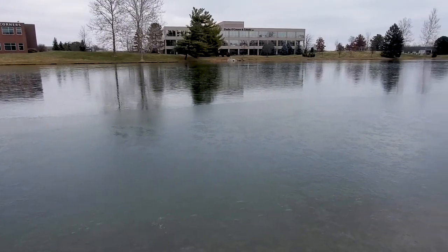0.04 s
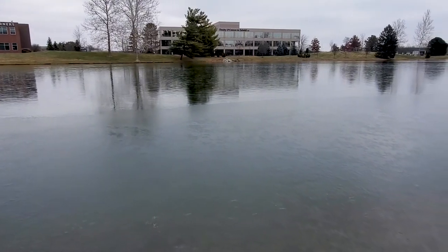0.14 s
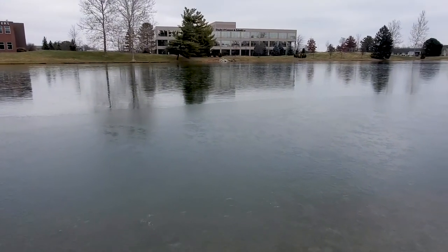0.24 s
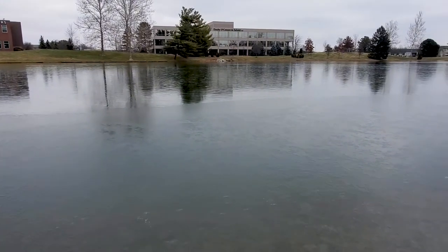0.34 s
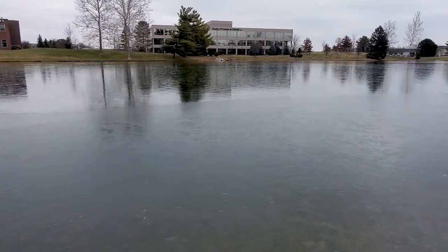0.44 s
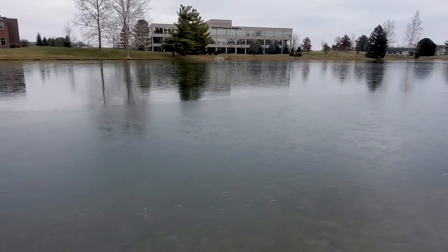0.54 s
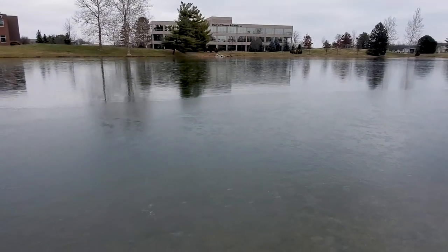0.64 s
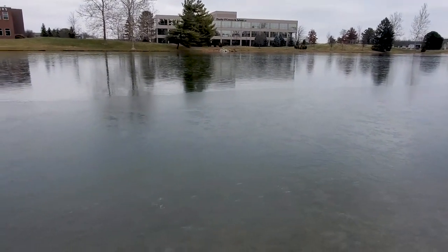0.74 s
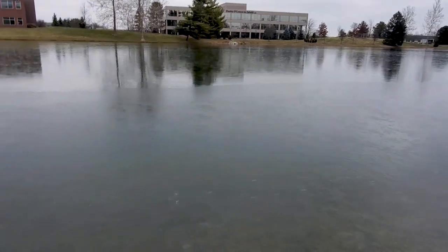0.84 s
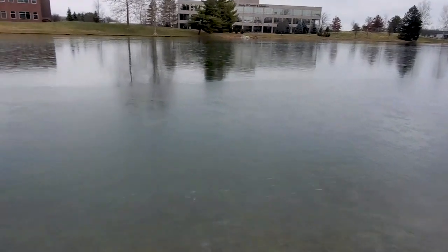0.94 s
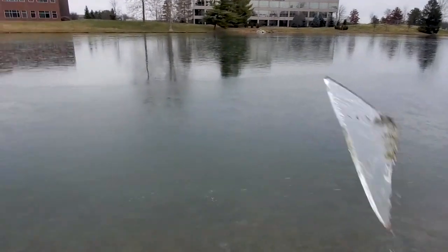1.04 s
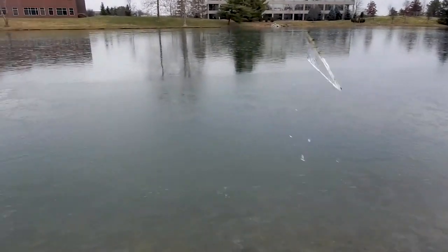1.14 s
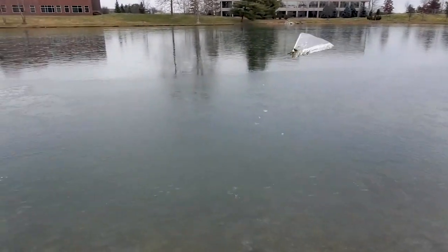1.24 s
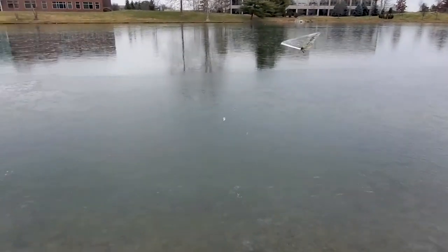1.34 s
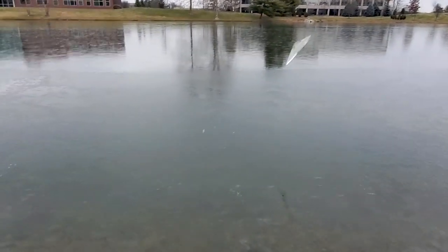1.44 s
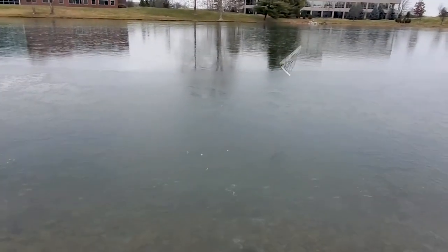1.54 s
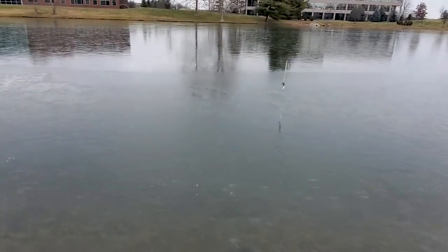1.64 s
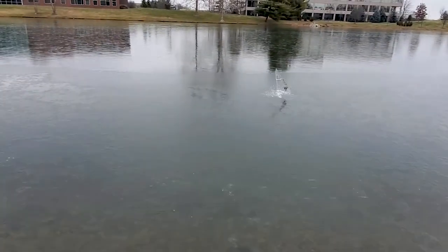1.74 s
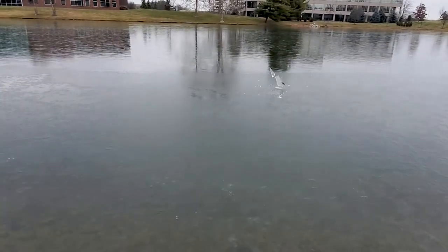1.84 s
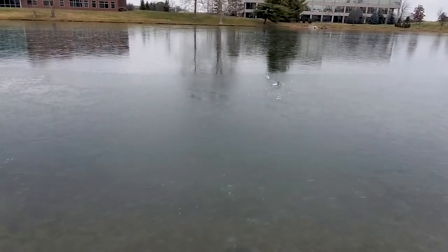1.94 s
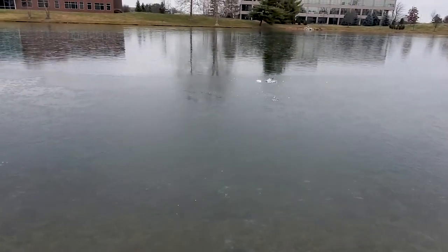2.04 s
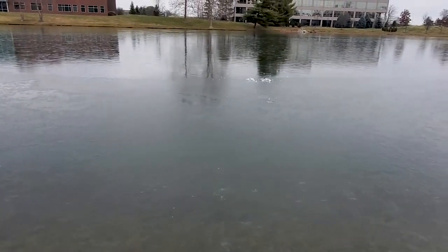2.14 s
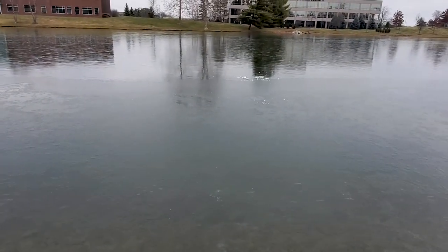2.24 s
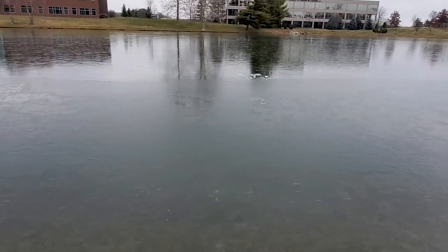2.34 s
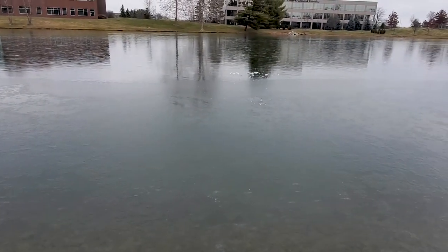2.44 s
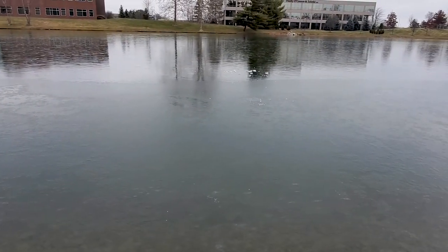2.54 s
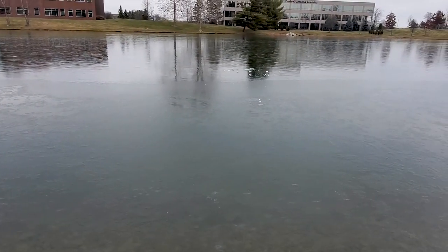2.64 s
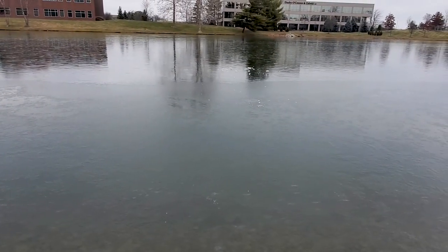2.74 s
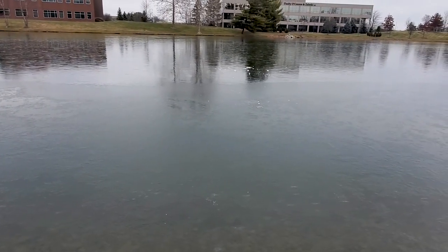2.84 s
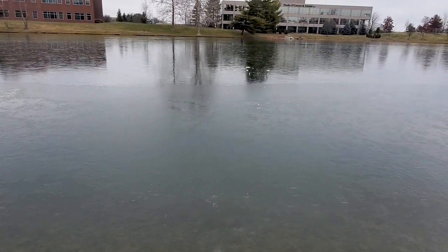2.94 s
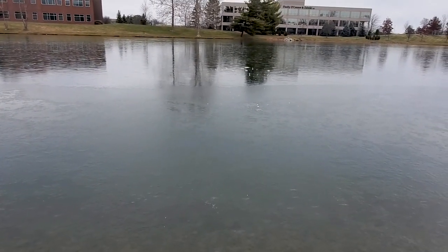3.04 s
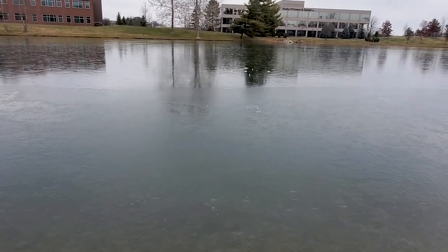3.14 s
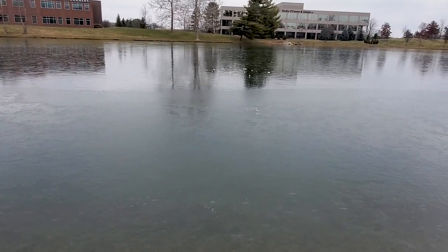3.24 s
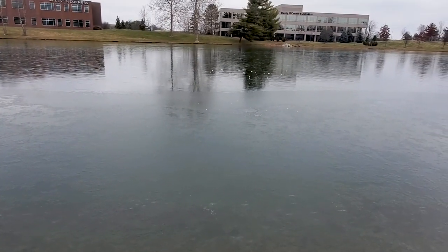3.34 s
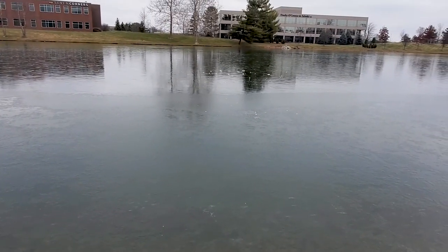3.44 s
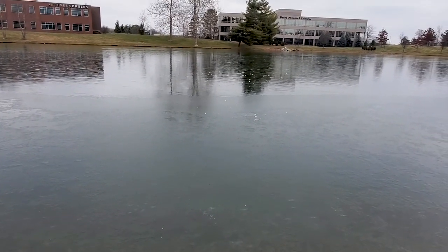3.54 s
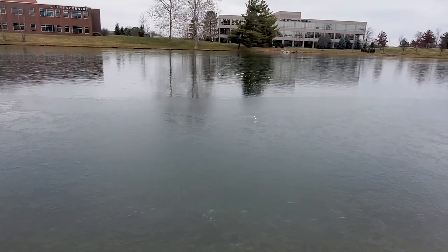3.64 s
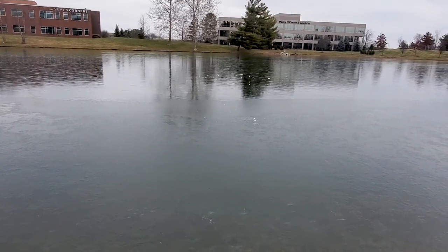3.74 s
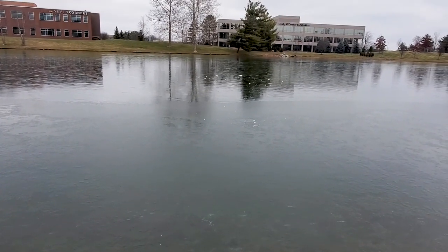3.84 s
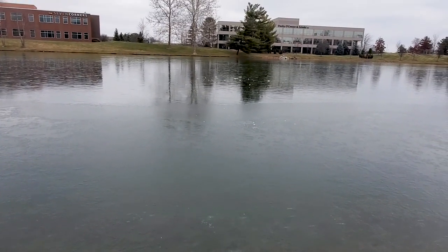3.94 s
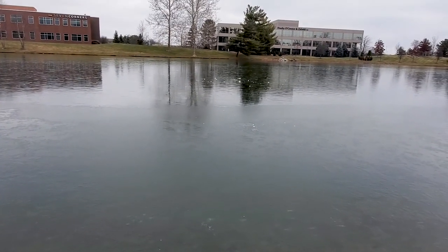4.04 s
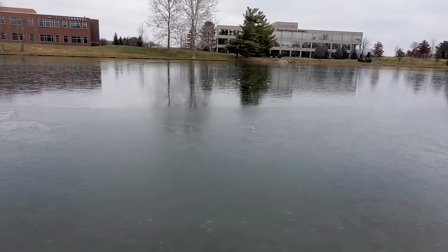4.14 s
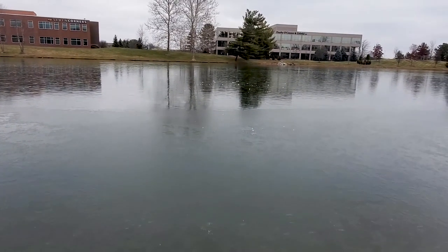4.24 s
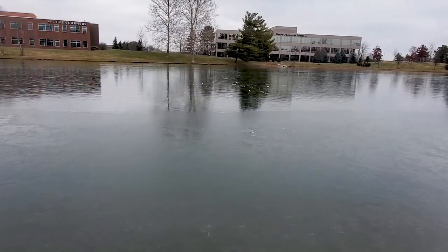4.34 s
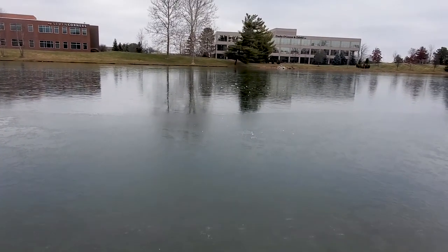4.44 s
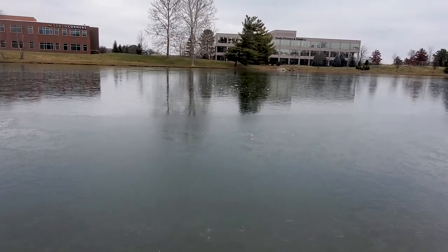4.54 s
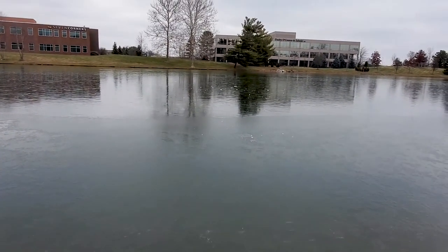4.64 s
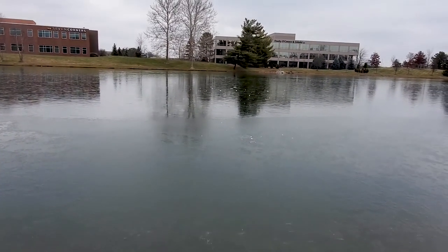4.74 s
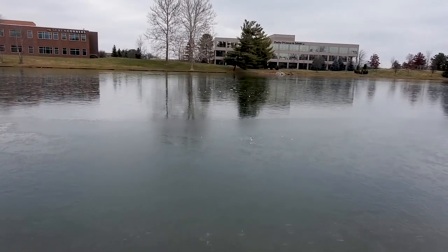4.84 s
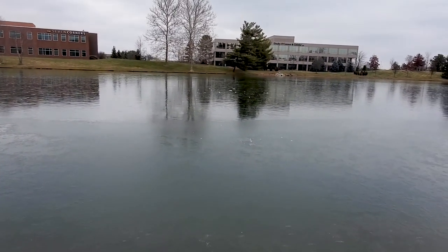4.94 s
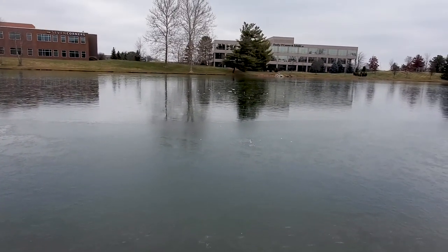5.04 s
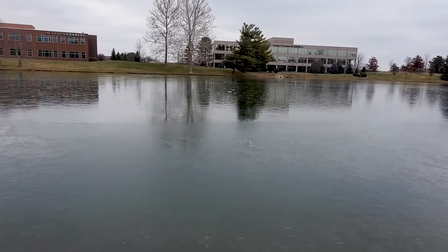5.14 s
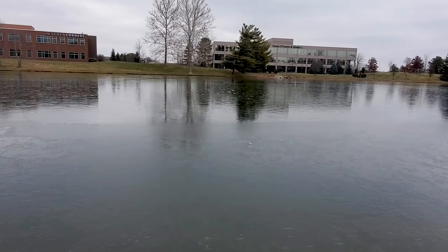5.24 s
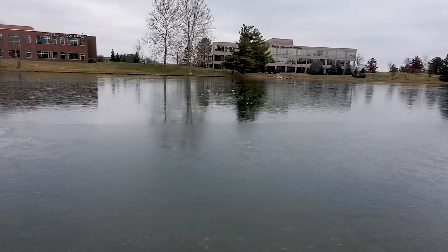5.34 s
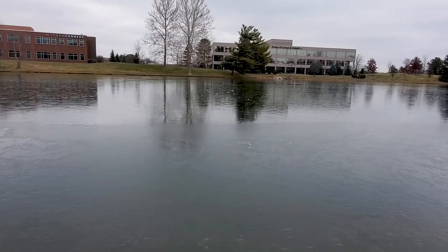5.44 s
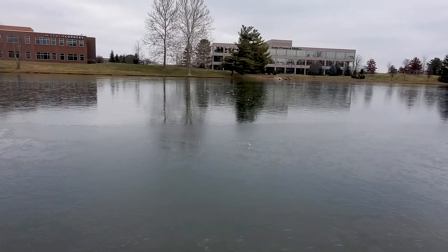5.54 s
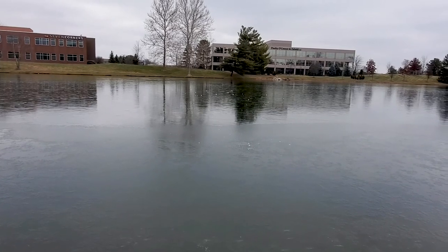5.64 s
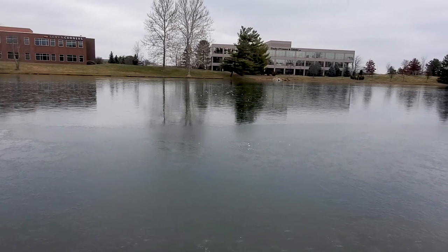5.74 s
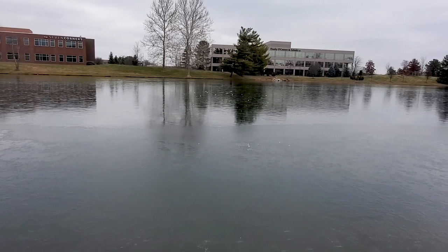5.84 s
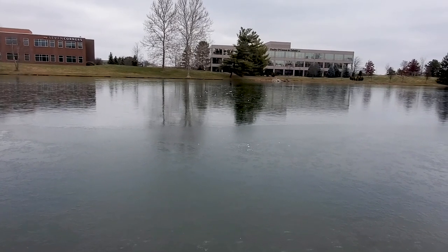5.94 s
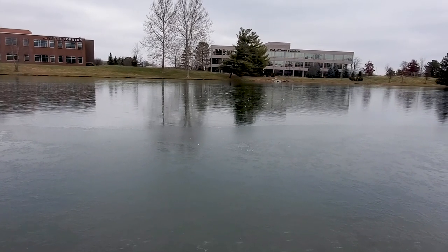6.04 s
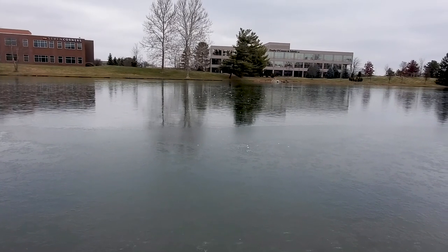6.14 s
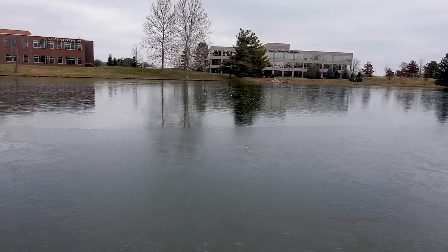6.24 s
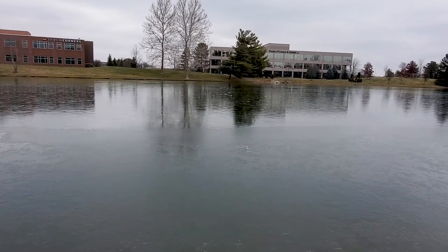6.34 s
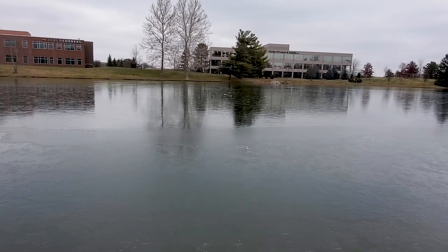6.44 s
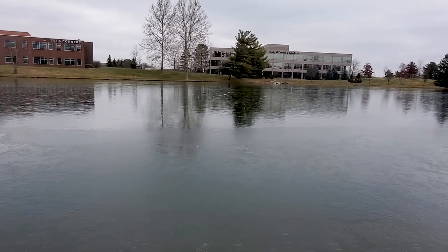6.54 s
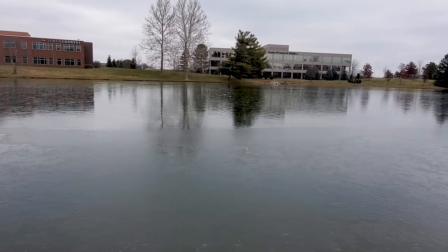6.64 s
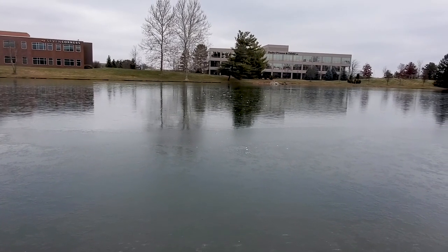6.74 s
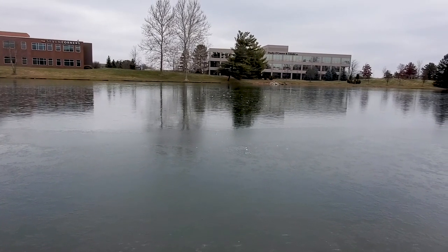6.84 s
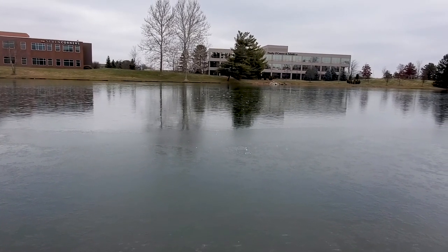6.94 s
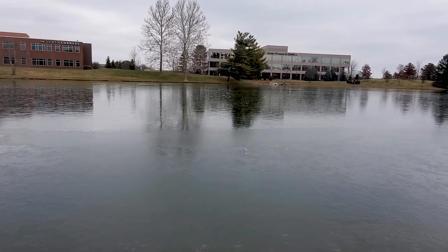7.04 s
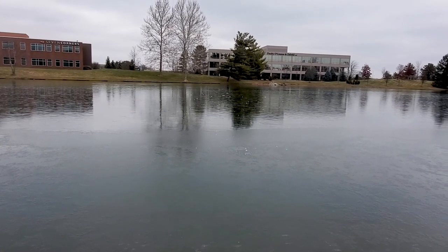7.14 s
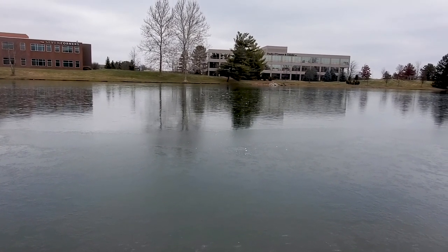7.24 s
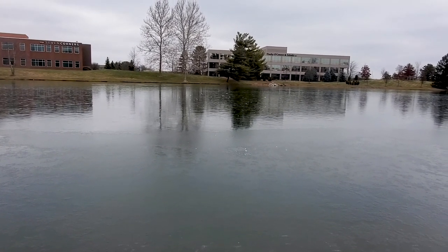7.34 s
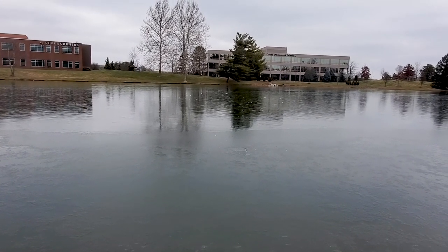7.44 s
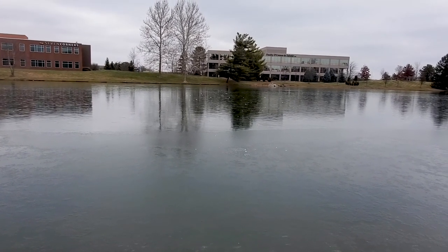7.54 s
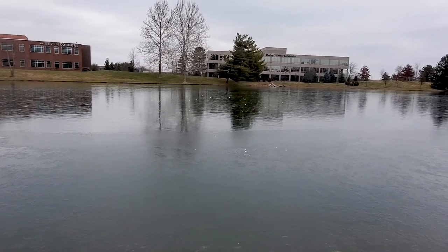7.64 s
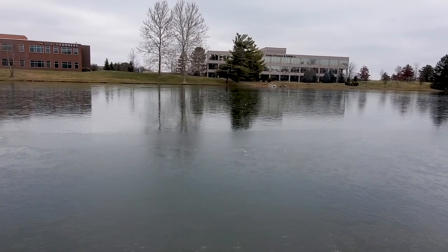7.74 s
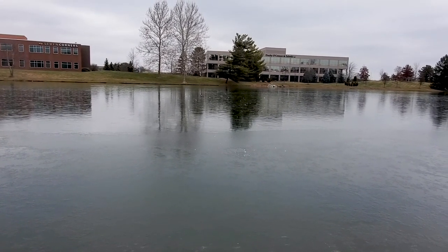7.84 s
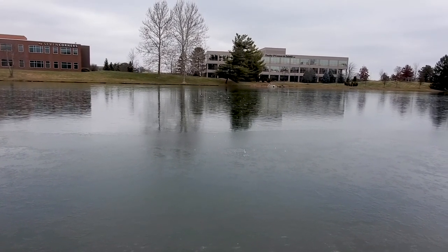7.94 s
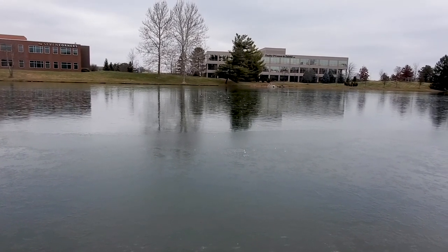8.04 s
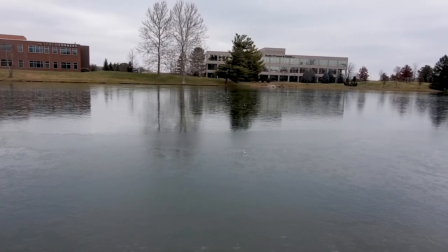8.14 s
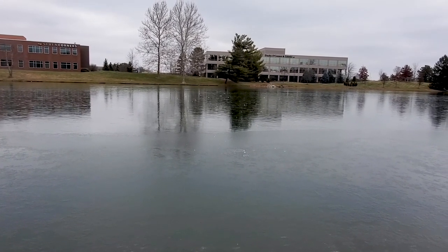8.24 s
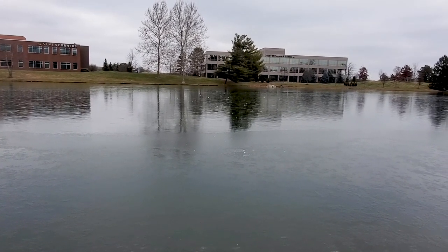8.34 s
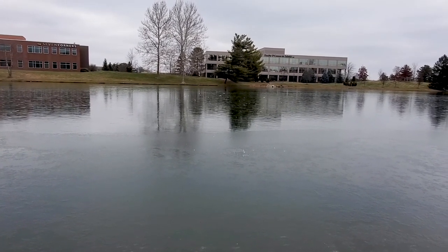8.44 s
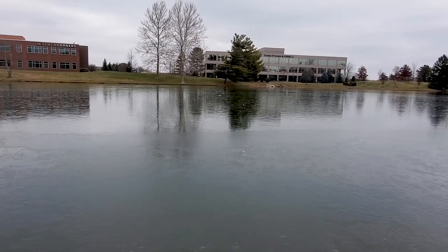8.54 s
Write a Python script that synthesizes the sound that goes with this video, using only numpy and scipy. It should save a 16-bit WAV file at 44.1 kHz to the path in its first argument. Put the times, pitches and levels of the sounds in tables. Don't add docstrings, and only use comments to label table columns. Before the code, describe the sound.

A low drone and soft wash of distant traffic lie under an open, nearly echo-free pond. Around 0.7 s cloth rustles and ticks faintly; at 1.0 s a sleeve whips past the camera with a short swish, crack and soft deep thump. At 1.75 s a slab strikes thin ice with a cluster of hard, bright clicks, briefly settles, then breaks up from 1.9 to 2.3 s in crackles, glassy pings and loud dry double pops near 2.09 s. From 2.3 s shards skate outward: a dense rattle of tiny falling chirps around 2 to 3 kHz, with a high whir near 7 kHz gliding down toward about 4 kHz by the end. Clinks, dull knocks and single swooping chirps stand out, busiest from 3.4 to 5.5 s, while bright scraping fades. The twitter thins after 6.5 s, a very faint far machine hum appears around 7.7 s, and it ends at 8.6 s still softly ringing, ice mostly left.

```python
import sys
import numpy as np
from scipy import signal
from scipy.fft import rfft, irfft, next_fast_len
from scipy.io import wavfile
from scipy.ndimage import map_coordinates

SR = 44100
rng = np.random.default_rng(int(sys.argv[2]) if len(sys.argv) > 2 else 0)


def elevation(decibels):
    levels = np.asarray(decibels, float)
    return 10 ** (levels / 20)


def wav_out(sig):
    wavfile.write(sys.argv[1], SR, np.round(np.clip(np.atleast_2d(sig).T, -1, 1) * 32767).astype(np.int16))


N = 378378

# (time [s], level [dB])
ENGINE_LOAD = [(0, -27), (0.15, -45.5), (0.3, -33.5), (0.6, -36.5), (0.92, -30.5), (1.2, -32),
               (1.65, -39.5), (1.85, -42.5), (2.4, -46.5), (3.45, -41), (4.4, -39.5), (4.7, -37.5),
               (5.3, -40), (5.7, -42), (6.2, -40.5), (7.3, -39), (7.9, -40.5), (8.58, -40)]
# (frequency [Hz], density [dB per Hz])
DRONE_SPECTRUM = [(12, -62), (33, -24), (54, -4.5), (70, 6), (82, 1.5), (140, -17), (170, -17), (220, -29),
                  (370, -120)]
# (frequency [Hz], density [dB per Hz])
TYRE_SPECTRUM = [(65, -15.5), (110, -4), (140, -10), (199, -10), (395, -21), (920, -21), (1050, -25),
                 (1150, -24.5), (1950, -25.5), (3200, -37.5), (5000, -59.5), (6500, -101), (11000, -120)]
# (frequency [Hz], correlation [0-1])
TYRE_ALIKE = [(60, 1), (180, 1), (550, 0.34), (1650, 0.023), (4970, 0.01), (15000, 0.12)]
# (frequency [Hz], left minus right [dB])
AROUND_BALANCE = [(60, -7), (110, 3), (200, 0), (380, 0.5), (700, 2.5), (1290, 2.5), (2380, 8.5),
                  (4400, 6.5), (8120, -6), (15000, 8)]
# (time [s], pitch [Hz], level [dB])
MACHINE_HUM = [
    (7.55, 523, -69),
    (7.7, 532, -61.5),
    (8.2, 516, -63),
    (8.45, 510, -70),
    (8.57, 500, -73),
]
TYRES_DB, TYRES_FOLLOW = -47, 0.2
TYRES_FADE_DB_PER_S = 0.5

# (time [s], level [dB])
ARM_SWISH = [
    (0.62, -98),
    (0.69, -83),
    (0.86, -73.5),
    (0.95, -64.5),
    (0.993, -40),
    (1.03, -56),
    (1.08, -72),
    (1.4, -81),
    (1.65, -100),
]
# (frequency [Hz], density [dB per Hz])
SLEEVE_SPECTRUM = [(150, -20), (300, 2.5), (700, -8.5), (1500, -8.5), (3000, -7.5), (7000, -19.5),
                   (12000, -18), (15700, -25)]
# (frequency [Hz], density [dB per Hz])
CLOTH_SPECTRUM = [(2000, 14), (3500, 1), (5500, 5.5), (6500, -3), (8000, -24), (16000, -42)]
# (time [s], peak level [dB])
SEAM_TICKS = [
    (.677, -54),
    (.848, -49),
    (.940, -56),
    (.950, -53),
]
# (time [s], peak level [dB])
CUFF_CRACKS = [
    (.992, -33),
    (.985, -44),
]
# (time [s], peak level [dB], pitch [Hz], length [s])
CLOTH_FLAPS = [
    (.998, -31.5, 658, 0.032),
    (1.012, -24, 206, 0.028),
    (1.2, -45, 500, .02),
]
RUSTLE_DB, RUSTLE_FOLLOWS = -55, 0.64

# (time [s], peak level [dB], pitch [Hz])
SLAB_BLOWS = [(1.744, -17.5, 2540), (1.751, -17, 2270), (1.7594, -18, 3040), (1.755, -24, 2540),
              (1.769, -34, 2500), (1.8009, -38, 2410), (1.807, -32, 2480), (1.812, -37, 2400),
              (1.827, -35, 2260), (1.831, -33, 2010), (1.8992, -29, 2330), (1.9087, -17, 2370),
              (1.912, -23.5, 2676), (1.9425, -27, 2480), (1.957, -31, 2200), (1.972, -27, 2300),
              (2.004, -26, 2720), (1.9491, -32, 2560), (1.987, -25, 2540), (1.997, -22, 2740),
              (2.015, -27, 2620), (2.031, -22, 2700), (2.036, -16, 2460), (2.066, -31, 2490),
              (2.0714, -32, 2700), (2.08, -16, 2550), (2.084, -13, 2325), (2.0925, -20, 2260),
              (2.1271, -35, 2470), (2.1606, -26, 2240), (2.166, -24, 2510), (2.177, -19.5, 2430),
              (2.2018, -24, 2520), (2.2103, -27, 2380)]
# (time [s], peak level [dB])
SLAB_SNAPS = [
    (2.0861, -5),
    (2.0896, -7),
]
# (time [s], peak level [dB], pitch [Hz])
SHARD_BUMPS = [(2.2553, -22, 2550), (2.2917, -20, 2370), (2.3286, -24, 2287), (2.6813, -27, 2260),
               (2.7117, -20, 2204), (2.797, -27, 2330), (2.8175, -27, 2220), (2.8489, -23, 2300),
               (3.023, -23, 2230), (3.2764, -24, 2440), (3.3104, -26, 2450), (3.3408, -23, 2250),
               (3.3752, -29, 2306), (3.4615, -23, 2220), (3.5483, -23, 2310), (3.5987, -23, 2280),
               (3.6331, -20.5, 2140), (3.7089, -20, 2307), (3.8037, -25, 2550), (3.8431, -22, 2350),
               (3.8486, -17.5, 2420), (3.9005, -22, 2280), (3.9469, -19, 2270), (3.9654, -20, 2270),
               (3.9998, -24, 2220), (4.0482, -15, 2220), (4.0816, -23, 2490), (4.144, -26, 2560),
               (4.1664, -24, 2170), (4.2417, -26, 2580), (4.2602, -25, 2170), (4.2956, -25, 2550),
               (4.3794, -22, 2220), (4.4019, -21, 2250), (4.6987, -28, 2290), (4.7561, -22, 2250),
               (4.7975, -21, 2270), (4.8499, -18, 2300), (4.9137, -14.5, 2260), (4.9776, -22, 2290),
               (5.0359, -25, 2300), (5.0793, -17, 2190), (5.1377, -20, 2240), (5.1731, -22, 2210),
               (5.2115, -26, 2210), (5.2749, -23, 2360), (5.3268, -24, 2250), (5.3856, -35, 2320),
               (5.4091, -24, 2240), (5.456, -23, 2170), (5.686, -25, 2220), (5.7274, -26, 2210),
               (5.9289, -29, 2550), (6.4068, -31, 2240), (7.3966, -24.5, 2200), (7.9124, -30, 2223),
               (8.4128, -32, 2240), (8.4587, -28, 2140)]
# (time [s], peak level [dB])
FAR_SWOOPS = [(3.4176, -37), (3.4799, -33), (3.5228, -38), (3.546, -29), (3.648, -28), (3.6884, -36),
              (3.7683, -40), (3.8581, -27.5), (3.9459, -45), (3.9693, -34), (4.0571, -30), (4.0821, -37),
              (4.104, -30), (4.2093, -36), (4.2322, -28), (4.306, -27), (4.4543, -23.5), (4.4777, -28),
              (4.564, -28), (4.6378, -30), (4.6977, -29), (4.744, -34), (4.77, -27), (4.814, -36),
              (4.8633, -26.5), (4.9137, -22.5), (5.1491, -25), (5.188, -27), (5.2858, -20.5), (5.3182, -31),
              (5.404, -33), (5.43, -35), (5.471, -26), (5.5597, -29), (5.642, -24), (5.859, -29),
              (5.9423, -30), (6.069, -25), (6.1094, -28), (6.4317, -25.5), (6.4936, -28), (6.5242, -26),
              (6.6817, -27), (6.7196, -33), (6.8163, -30), (6.8737, -26), (7.0616, -29), (7.3017, -33),
              (7.3377, -28), (7.419, -28), (7.5352, -25.5), (7.5811, -26), (7.6689, -34), (7.7133, -27),
              (7.8111, -29), (7.946, -22.5), (8.076, -32), (8.49, -26.5)]
# (time [s], peak level [dB])
HEAVY_KNOCKS = [(2.422, -34), (2.4657, -40), (3.371, -39), (3.5128, -43), (3.7687, -52), (3.862, -36),
                (3.956, -31.5), (4.5649, -50), (4.6063, -45), (4.687, -35), (4.7348, -33), (4.894, -39),
                (5.245, -33), (5.5397, -49), (5.9303, -38), (6.2032, -33), (6.283, -40), (6.7185, -34.5),
                (6.9152, -39), (8.0053, -40)]
# (time [s], peak level [dB])
FAR_SKIPS = [(2.2963, -40), (2.3303, -35), (2.3831, -40), (3.4276, -45), (3.6887, -36), (3.77, -39),
             (4.3502, -46), (4.4953, -47), (4.7658, -31), (4.8156, -31), (5.059, -24), (5.4048, -30),
             (5.4352, -36), (5.945, -29), (6.2158, -34), (6.5277, -35), (6.7203, -28), (7.302, -42),
             (7.4192, -35), (7.715, -34), (7.8116, -36)]
# (time [s], peak level [dB], pitch [Hz], length [s])
SPLINTER_PINGS = [(1.7585, -39, 340, 0.0075), (1.97, -43, 6400, .008), (2.034, -19.5, 3600, 0.0053),
                  (2.138, -35, 3400, 0.017), (1.78, -34.5, 523, 0.0077), (2.03, -45, 510, 0.0115),
                  (2.087, -39, 1100, 0.00496), (1.775, -44, 1500, 0.028), (2.349, -29, 3800, .007),
                  (2.257, -33, 3700, .008), (1.954, -48.5, 754, .03), (1.758, -27.5, 4350, 0.028),
                  (1.818, -49, 752, 0.055), (1.926, -46, 4900, 0.017), (1.998, -35, 5130, 0.019),
                  (2.014, -31.5, 3540, 0.024), (2.07, -39, 7200, 0.009), (2.171, -35, 4450, 0.024),
                  (2.178, -43, 6600, 0.018), (2.22, -47, 6800, .016), (2.241, -38, 4450, 0.033),
                  (2.288, -48, 5550, 0.022)]

# (time [s], peak level [dB], dull part [dB])
AIR_CRACKS = [(1.75, -22, -3), (1.7525, -29, 7.5), (1.7552, -33, 12), (1.7584, -24, 4.5),
              (1.761, -33, 10.5), (1.8654, -45, -16), (1.887, -48, -8), (1.904, -38, 1), (1.915, -31, 1.5),
              (1.9265, -48, -22), (1.9488, -39, 3), (1.98, -54, 8), (1.9914, -34, 9.5), (1.995, -31.5, 4),
              (2.025, -27, 3.5), (2.03, -24, 2.5), (2.0447, -26, 0), (2.0716, -34, -7), (2.079, -34.5, 8),
              (2.0896, -24, 4), (2.0935, -30, -9), (2.116, -50, -19), (2.127, -33.5, 2), (2.156, -48, -7),
              (2.175, -28.5, -2.5), (2.185, -34, 0), (2.25, -42, 2), (2.296, -52.5, 21), (2.3314, -55, 21)]
# (frequency [Hz], density [dB per Hz])
CRACK_SPECTRUM = [(200, -26), (700, -13.5), (1300, -7.5), (2300, 5), (4400, -1), (7700, -24.5),
                  (10000, -26.5), (12700, -13), (15700, -20)]
# (time [s], peak level [dB])
DRY_TICKS = [(2.4033, -53), (2.4592, -51), (2.6687, -44), (2.7434, -44), (3.1374, -51), (3.3634, -36.5),
             (4.8775, -52), (4.898, -46), (5.3285, -50), (6.2565, -56), (6.3516, -51), (6.595, -50),
             (6.6864, -50), (7.0725, -56), (7.5895, -64), (7.9576, -78)]
# (time [s], peak level [dB])
SHARD_TINGS = [(5.3773, -46), (5.5689, -45), (5.7758, -44), (5.9605, -47), (6.441, -46), (6.6087, -52),
               (7.3327, -69), (7.7178, -51), (7.9533, -51), (8.2117, -58), (8.2431, -58), (8.4143, -74)]
# (time [s], peak level [dB])
SPLINTER_SPITS = [(1.787, -50), (1.805, -48), (1.8095, -48), (1.8165, -46), (1.823, -50), (1.832, -51),
                  (1.843, -50), (1.9485, -29), (1.9745, -40), (2.012, -38), (2.112, -31), (2.161, -39),
                  (2.2035, -35), (2.2405, -41), (2.279, -47), (2.377, -53)]
CRACK_S, TING_HZ = 0.0042, 6980

# (time [s], level [dB])
RATTLE = [(1.77, -37), (1.82, -46), (1.87, -57), (1.93, -47.5), (2.06, -34.5), (2.32, -36), (2.55, -39.5),
          (2.85, -38), (3.2, -39), (3.95, -34), (4.2, -37), (4.75, -37), (5.4, -36.5), (5.6, -40),
          (6.5, -39.5), (7.2, -43.5), (7.6, -43.5), (8.58, -46.5)]
# (frequency [Hz], density [dB per Hz])
EDGE_SPECTRUM = [(4000, -19), (6000, -12), (7300, -3), (8200, -12.5), (10800, -12.5), (12300, -5),
                 (14000, -8.5), (15700, -7.5)]
# (frequency [Hz], density [dB per Hz])
RUB_SPECTRUM = [(600, -34), (1280, -6.5), (1390, -3), (1520, -5), (1780, 2.5), (3000, 2), (6000, -11),
                (8500, -63)]
SCRAPE_DB, SCRAPE_FADES_DB_PER_S2 = -25.5, 0.47
SPREAD_S, FAN_OUT_S = 2.406, 0.44
MIDDLE_DB, UNSPREAD_DB = -7, -19
MIDDLE_BUSIEST_S, MIDDLE_ARCH_DB_PER_S2, MIDDLE_THINS_DB = 2.8, 0.62, 7
FAR_DB, FAR_EMPTY_DB, FAR_FILLS_S = 0.5, -26, 2.66
SHORE_HZ, LEAD_HZ, THICK_HZ = 4110, 7015, 3021
THINNEST_HZ = 7430
THIN_UNTIL_S, THICKENS_S = 2.65, 4.5
SCATTERS_S = 2.18
KNOCK_HZ = 1725

# (time [s], peak level [dB], low mode [dB], time until landing [s])
SHARD_FLIGHTS = [
    (1.951, -36.5, -9, 0.041),
    (1.994, -24.5, -7, 0.034),
    (2.024, -39, 9, 0.012),
    (2.238, -34.5, -35, 0.033),
    (2.296, -40.5, -35, 0.017),
    (2.34, -47, -35, .025),
]
# (frequency [Hz], level [dB], t60 [s])
BIG_MODES = [(861, 0, .18), (1427, 0, .15), (2250, -8, .1)]
# (frequency [Hz], level [dB], t60 [s])
SLIDER_MODES = [(1374, -1.5, 0.082)]
# (start [s], end [s])
ROUGH_BOUTS = [
    (3.15, 4.15),
    (4.68, 5.5),
    (5.9, 6.4),
    (6.65, 7.7),
]
# (time [s], peak level [dB])
STOUT_CLINKS = [(2.2349, -27), (2.2962, -36), (2.3306, -34), (2.383, -31), (2.9428, -27), (2.9911, -30),
                (3.0819, -35), (3.4282, -37), (3.5459, -19), (3.6886, -25), (3.7689, -28), (3.8996, -31),
                (3.9699, -21), (4.0567, -23), (4.1031, -23), (4.3506, -39), (4.4952, -40), (4.7666, -24),
                (4.8155, -25), (4.9297, -23), (5.0594, -20), (5.2645, -30), (5.3184, -37), (5.4047, -27),
                (5.4351, -33), (5.473, -28), (5.5663, -35), (5.9449, -28), (6.0692, -35), (6.2163, -26),
                (6.4333, -39), (6.4937, -40), (6.5246, -34), (6.6823, -33), (6.7197, -26), (6.8838, -29),
                (7.0609, -33), (7.3023, -36), (7.3383, -35), (7.4191, -33)]
# (frequency [Hz], level [dB], t60 [s])
STOUT_MODES = [(3490, -0.5, 0.034), (4487, 0.5, 0.032)]

# (frequency [Hz], t60 [s])
BANK_DECAY = [(500, 0.17), (2500, 0.09), (12000, 0.073)]
# (frequency [Hz], left minus right [dB])
BODY_SHADOW = [(60, -13), (110, 8), (200, 11), (380, -2), (700, 2.5), (1290, 12.5), (2380, 14.5),
               (4400, 13.5), (8120, 9), (15000, 20)]
# (frequency [Hz], correlation [0-1])
ICE_LIKENESS = [(600, .8), (1400, .75), (3000, .72), (7000, .65), (15000, .55)]
# (frequency [Hz], density [dB per Hz])
HISS_SPECTRUM = [(3000, -33), (5700, 3), (7000, -10), (8300, 0.5), (9500, -9), (15500, -12.5)]
TOP_HZ = 15850


def unit(x):
    return x / np.sqrt(np.mean(x ** 2) + 1e-20)


def along(points, hz):
    f, v = np.transpose(points)
    return np.interp(np.log(hz + 1), np.log(f + 1), v)


def curves(rows, at=None, silent=-140):
    s, *columns = np.transpose(rows)
    at = np.arange(N) / SR if at is None else at
    return [np.interp(at, s, c, left=silent, right=silent) for c in columns]


def wobble(rate):
    knots = rng.standard_normal(int(N * rate / SR) + 4)
    return map_coordinates(knots, [np.arange(N) * rate / SR])


def filtered(x, response):
    m = next_fast_len(N + SR // 2)
    return irfft(rfft(x, m) * response(np.fft.rfftfreq(m, 1 / SR)), m)[..., :N]


def above(hz, corner, order=4):
    return 1 / (1 + (corner / (hz + 1)) ** order)


def rush(spectrum, alike):
    def shape(hz):
        turn = np.arccos(np.clip(along(alike, hz), -1, 1)) / 2
        return elevation(along(spectrum, hz)) * np.array([np.cos(turn), np.sin(turn)])
    mid, side = filtered(rng.standard_normal((2, N)), shape)
    return unit(np.array([mid + side, mid - side]))


def shaded(x):
    return filtered(x, lambda hz: elevation(along(AROUND_BALANCE, hz) / 2 * np.array([[1], [-1]])))


def traffic():
    load_db, = curves(ENGINE_LOAD)
    tyres_db = TYRES_DB + TYRES_FOLLOW * (load_db + 40) - TYRES_FADE_DB_PER_S * np.arange(N) / SR
    drone = elevation(load_db) * rush(DRONE_SPECTRUM, [(30, .89), (70, .95), (150, 0.93)])
    tyres = elevation(tyres_db + 2.5 + 0.93 * wobble(11.0)) * rush(TYRE_SPECTRUM, TYRE_ALIKE)
    hum_hz, hum_db = curves(MACHINE_HUM)
    hum = elevation(hum_db + 2.3 * wobble(9)) * np.sin(2 * np.pi * np.cumsum(hum_hz) / SR)
    return drone + shaded(tyres) + hum


def placed(s, waves):
    where = np.round(s * SR).astype(int)[:, None] + np.arange(waves.shape[1])
    return np.bincount(where.ravel(), waves.ravel(), N + SR)[:N]


def puffs(s, db, life):
    life = np.broadcast_to(life, s.shape)[:, None]
    u = np.clip(np.arange(SR // 60) / SR / life, 0, 1)
    bursts = np.sin(np.pi * u) ** 2 * rng.standard_normal(u.shape)
    return placed(s - life[:, 0] / 2, elevation(db)[:, None] * bursts)


def chirps(s, db, hz, life, fall):
    life = np.broadcast_to(life, s.shape)[:, None]
    t = np.arange(int(life.max() * SR) + 1) / SR
    u = np.clip(t / life, 0, 1)
    phase = 2 * np.pi * hz[:, None] * t * (1 + fall * (1 - u) / 2)
    start_phase = 2 * np.pi * rng.random((len(s), 1))
    wave = np.sin(np.pi * u) ** 2 * np.sin(phase + start_phase)
    return placed(s - life[:, 0] / 2, elevation(db)[:, None] * wave)


def throw():
    swish_db, = curves(ARM_SWISH)
    rustle_db = RUSTLE_DB + RUSTLE_FOLLOWS * (swish_db + 62.0)
    air = elevation(swish_db + 9.5) * rush(SLEEVE_SPECTRUM, [(200, 0.98), (700, 0.96), (1500, 0.0), (12000, 0.0)])
    rustle = elevation(rustle_db + 3.0 + 3.8 * wobble(30.1)) * rush(CLOTH_SPECTRUM, [(3000, .1)])
    wake_db = -49 - 7.9 * ((np.arange(N) / SR - .995) / 0.057) ** 2
    wake = elevation(wake_db) * rush([(400, -25), (900, -2), (2500, 0), (5000, -25)], [(1500, .3)])
    s, db = np.transpose(SEAM_TICKS)
    seams = filtered(puffs(s, db, 0.0034), lambda hz: above(hz, 4500) / (1 + (hz / 11000) ** 4))
    s, db = np.transpose(CUFF_CRACKS)
    cuff = filtered(puffs(s, db, 0.007), lambda hz: above(hz, 6500))
    s, db, hz, life = np.transpose(CLOTH_FLAPS)
    flaps = chirps(s, db, hz, life, fall=0.023)
    return shaded(air + rustle + wake) + seams + cuff + flaps


def lead_pitch(s):
    out = np.clip(1 + (s - SPREAD_S - .15) / FAN_OUT_S, 0, 1)
    thinness = np.exp(-np.maximum(s - THIN_UNTIL_S, 0) / THICKENS_S)
    ahead_hz = THICK_HZ + (LEAD_HZ - THICK_HZ) * thinness
    return SHORE_HZ + out ** 3 * (ahead_hz - SHORE_HZ)


def scattered(hz, share):
    return hz * np.exp(share * rng.standard_normal(len(hz)))


def landings():
    s, db, hz = np.transpose(SLAB_BLOWS)
    blows = chirps(s, db - .5, hz, 0.0069, fall=0.29)
    s, db = np.transpose(SLAB_SNAPS)
    snaps = chirps(s, db, np.full(len(s), 2300), .0013, fall=0.26)
    s, db, hz = np.transpose(SHARD_BUMPS)
    bumps = chirps(s + 0.002974, db - 8.0, hz, 0.013, fall=0.12)
    s, db = np.transpose(FAR_SWOOPS)
    swoops = chirps(s + 0.0027, db - 9.0, scattered(.97 * lead_pitch(s), 0.0303), 0.014, fall=0.208)
    s, db = np.transpose(HEAVY_KNOCKS)
    knocks = chirps(s + 0.0032, db, scattered(np.full(len(s), KNOCK_HZ), 0.11), 0.00684, fall=0.21)
    s, db = np.transpose(FAR_SKIPS)
    skips = 0
    for share in (.9, .55, .25):
        hz = scattered(2700 + share * (lead_pitch(s) - 2700), 0.046)
        skips = skips + chirps(s + .006 * (1 - share), db - 9.0, hz, .006, fall=0.41)
    s, db, hz, life = np.transpose(SPLINTER_PINGS)
    pings = chirps(s, db, hz, life, fall=0.0081)
    return blows + snaps + bumps + swoops + knocks + skips + pings


def skating():
    near_db, = curves(RATTLE)
    since = np.arange(N) / SR - SPREAD_S
    arch_db = MIDDLE_ARCH_DB_PER_S2 * (since + SPREAD_S - MIDDLE_BUSIEST_S) ** 2
    middle_db = MIDDLE_DB + UNSPREAD_DB * np.clip(-since / FAN_OUT_S, 0, 1)
    middle_db = middle_db - np.minimum(arch_db, MIDDLE_THINS_DB)
    far_db = FAR_DB + UNSPREAD_DB * (since < 0)
    far_db = far_db + FAR_EMPTY_DB * np.exp(-np.maximum(since, 0) / FAR_FILLS_S)
    scrape_db = SCRAPE_DB - SCRAPE_FADES_DB_PER_S2 * since ** 2
    return near_db, near_db + middle_db, near_db + far_db, near_db + scrape_db


def patter(count, spread_db):
    s = rng.uniform(RATTLE[0][0], N / SR, count)
    size, a, b = np.clip(rng.standard_normal((3, count)), -2, 2)
    return s, spread_db * size, a, b


def cracks():
    s, db, body_db = np.transpose(AIR_CRACKS)
    colour = lambda hz: elevation(along(CRACK_SPECTRUM, hz) - along(CRACK_SPECTRUM, 12300.0))
    bright = filtered(puffs(s, db + 0.11, 1.4 * CRACK_S), lambda hz: colour(hz) * above(hz, 4000))
    dull = filtered(puffs(s, db + body_db - 6.5, 2.2 * CRACK_S),
                    lambda hz: colour(hz) * (1 - above(hz, 4000)))
    s, db = np.transpose(DRY_TICKS)
    ticks = filtered(puffs(s, db - 0.5, 0.0058),
                     lambda hz: elevation(0.68 * along(EDGE_SPECTRUM, hz) + 6.0) * above(hz, 6000))
    s, db = np.transpose(SHARD_TINGS)
    tings = chirps(s, db + .3, TING_HZ * np.ones(len(s)), 0.0043, fall=.03)
    s, db, a, _ = patter(count=260, spread_db=5.0)
    tumble = elevation(skating()[0] - 27) * chirps(s, db, TING_HZ * np.exp(.03 * a), .005, fall=.03)
    s, db = np.transpose(SPLINTER_SPITS)
    spits = filtered(puffs(s, db + 2.5, 0.002), lambda hz: above(hz, 10500, order=8))
    return spits + bright + dull + ticks + tings + tumble


def sheet(jolts):
    near_db, middle_db, far_db, _ = skating()
    s, db, a, b = patter(count=5000, spread_db=1.0)
    thinner = rng.random(len(s)) ** 1.296
    near_hz = 2190 * np.exp(0.2797 * thinner)
    near = chirps(s, db - 8.4 * thinner, near_hz, .0115 * np.exp(.3 * b), fall=0.1)

    s, db, a, b = patter(count=8500, spread_db=4.0)
    share = rng.random(len(s)) ** 1.03
    octaves = share * np.log2(lead_pitch(s) / 2850)
    middle = chirps(s, db - 9.0 * octaves, 2800 * 2 ** octaves, .0042 * np.exp(.3 * b), fall=0.29)

    s, db, a, b = patter(count=6000, spread_db=3.5)
    apart = np.clip((s - SPREAD_S) / SCATTERS_S, .25, 1)
    detune = 0.055 * rng.standard_normal(len(s)) - 0.0594 * np.abs(a)
    lead_hz = lead_pitch(s) * np.exp(apart * detune)
    behind = np.clip(0.1526 * apart * rng.exponential(size=len(s)), 0, 1)
    far_hz = lead_hz * (THINNEST_HZ / lead_hz) ** behind
    far = chirps(s, db - 30 * behind, far_hz, 0.011 * np.exp(0.33 * b), fall=0.22 * apart[:, None])

    swarm = elevation(near_db - 4.5) * unit(near * elevation(0.82 * jolts))
    swarm += elevation(middle_db + 1.0) * unit(middle * elevation(2.0 * jolts))
    swarm += elevation(far_db - 1.5) * unit(far * elevation(1.77 * jolts))
    return swarm


def scraping(jolts):
    s, db, sign, _ = patter(count=9000, spread_db=5.0)
    clicks = placed(s, (elevation(db) * np.sign(sign))[:, None])
    dust = (unit(clicks) + 0.7 * rng.standard_normal(N)) * elevation(2.05 * jolts)
    near_db, _, _, scrape_db = skating()
    edge = filtered(dust, lambda hz: elevation(along(EDGE_SPECTRUM, hz)))
    rub = filtered(dust, lambda hz: elevation(along(RUB_SPECTRUM, hz)))
    return elevation(scrape_db + 3.5) * unit(edge) + elevation(near_db - 9.5) * unit(rub)


def rings(events, modes):
    s, db, first_db, flight = np.transpose(events)
    t = np.arange(SR // 12) / SR
    onset = 1 - np.exp(-t / 0.00029)
    landed = elevation(-60 * np.maximum(t - flight[:, None], 0) / 0.035)
    wave = 0
    for k, (hz, level_db, t60) in enumerate(modes):
        strength = db + level_db + (first_db if k == 0 else 0) + rng.normal(0, 1, len(s))
        detune = 1 + 0.0095 * rng.standard_normal((len(s), 1))
        wave = wave + elevation(strength[:, None] - 60 * t / t60) * np.sin(2 * np.pi * hz * detune * t)
    return placed(s, onset * landed * wave)


def heavy_hops():
    hops = [(s, db - 9.5, 0, .035) for s, db in HEAVY_KNOCKS]
    times, sizes, _, _ = patter(count=240, spread_db=3.5)
    levels = sizes + curves(RATTLE, at=times)[0]
    for s, db in zip(times, levels):
        if any(a < s < b for a, b in ROUGH_BOUTS):
            hops.append((s, db - 12.0, 0, .03))
    return rings(hops, SLIDER_MODES)


def echoed(x):
    hz, t, z = signal.stft(rng.standard_normal(SR // 3), SR, nperseg=128)
    decay = elevation(-60 * t / along(BANK_DECAY, hz)[:, None])
    tail = signal.istft(z * decay, SR, nperseg=128)[1]
    return signal.fftconvolve(x, tail / np.linalg.norm(tail))[:N]


def ports(x):
    z = signal.stft(x, nperseg=256)[2]
    random_phase = np.exp(2j * np.pi * rng.random(z.shape))
    stray = signal.istft(z * random_phase, nperseg=256)[1][:N]
    stray = stray * np.std(x) / np.std(stray)

    def response(hz):
        alike = np.clip(along(ICE_LIKENESS, hz), 0, 1)
        shade = elevation(-along(BODY_SHADOW, hz)) * np.exp(2j * np.pi * hz / SR)
        return shade * np.array([alike, np.sqrt(1 - alike ** 2)])
    right = filtered(np.array([x, stray]), response)
    return elevation(6.0) * np.array([x, right.sum(axis=0)])


def scene():
    jolts = 2 * np.tanh(.5 * wobble(40) + 0.12 * wobble(10))
    clinks = [(s, db - 8.0, 0, .004) for s, db in STOUT_CLINKS]
    ice = landings() + cracks() + sheet(jolts) + scraping(jolts)
    ice += rings(SHARD_FLIGHTS, BIG_MODES) + heavy_hops() + rings(clinks, STOUT_MODES)
    echo = elevation(-11.5) * echoed(ice)
    return traffic() + throw() + ports(ice + echo)


def low_pass(x):
    return signal.sosfilt(signal.butter(12, 16830, fs=SR, output="sos"), x)


def record(dry):
    hiss = elevation(-77.0) * rush(HISS_SPECTRUM, [(5000, 0.0053)])
    heard = filtered(dry + hiss, lambda hz: np.clip((TOP_HZ - hz) / 200, 0, 1))
    return low_pass(np.clip(heard, -1, 1))


dry = scene()
out = record(dry)
wav_out(out)
```